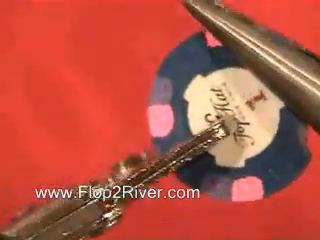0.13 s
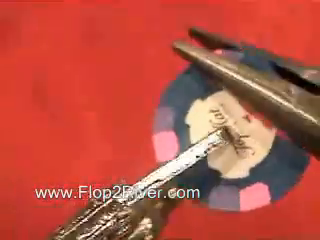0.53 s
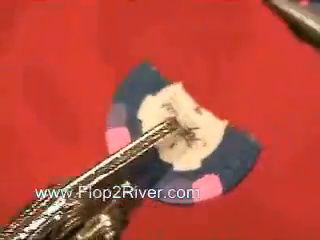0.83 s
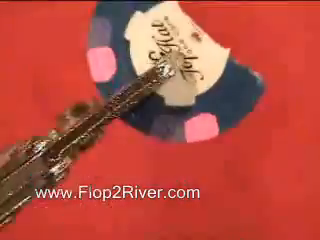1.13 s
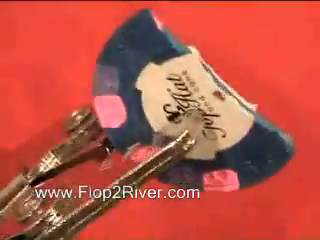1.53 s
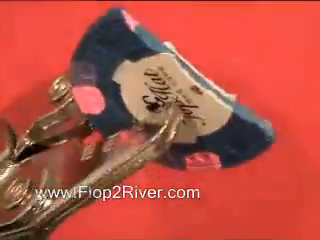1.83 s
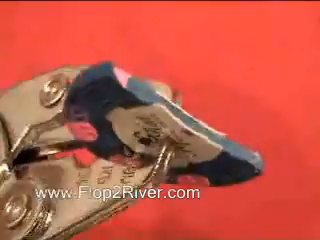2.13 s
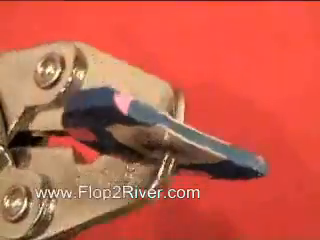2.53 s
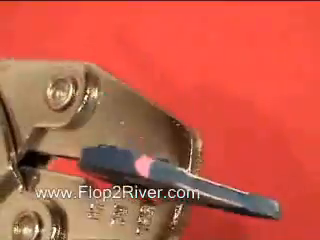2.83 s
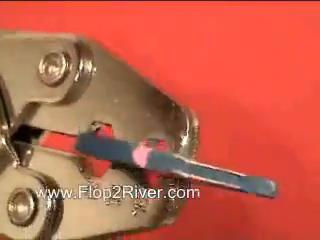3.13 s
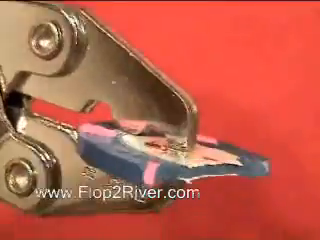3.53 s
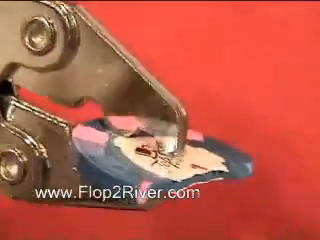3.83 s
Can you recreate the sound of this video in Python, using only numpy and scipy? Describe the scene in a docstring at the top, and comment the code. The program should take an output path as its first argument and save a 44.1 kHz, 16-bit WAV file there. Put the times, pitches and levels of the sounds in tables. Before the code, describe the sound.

A plastic disc snaps in pliers, close to the microphone in a small room. Faint creaking ticks start at about 0.35 s; near 0.48-0.51 s three bright, hard cracks come almost as one, with splintery crackle. A shard lands in soft, tiny knocks until about 0.63 s, with a short room tail. Low, dull ventilation noise and a thin motor whine run throughout, alone until the end around 4 s.

```python
"""Indoor ventilation noise, swelling at the room's low resonances, and a small motor's thin whine run throughout.
Close by, pliers bend a plastic disc: it creaks in tiny ticks, clicks ringing its modes over splinter crackle.
It breaks in three sharp cracks, and the shard lands on the table in soft band-limited knocks.
A smeared table echo and a decaying noise tail answer each of these close sounds."""
import sys
import numpy as np
from scipy import signal
from scipy.fft import rfft, irfft, next_fast_len
from scipy.io import wavfile

SR = 44100
rng = np.random.default_rng(int(sys.argv[2]) if len(sys.argv) > 2 else 0)


def dump(signal):
    """Clip the signal to [-1, 1] and save it as 16-bit WAV at the path in sys.argv[1]."""
    limited = np.clip(np.atleast_2d(signal).T, -1, 1)
    pcm = np.round(limited * 32767).astype(np.int16)
    wavfile.write(sys.argv[1], SR, pcm)


def invert_db(level):
    """Linear amplitude ratio for a level in decibels (20 dB per decade), elementwise."""
    return 10 ** (np.asarray(level, dtype=float) / 20)


N = 175518

# ventilation spectrum, relative: f/Hz, level/dB per Hz
AIR_SPECTRUM = [(13, -49.5), (22, -27), (40, -15.5), (55, -8.5), (85, -6), (130, -4.5), (230, -3),
                (320, -8), (600, -9.5), (1000, -14.5), (1500, -19), (2200, -21), (4000, -25.5),
                (6300, -31.5), (7300, -34), (8000, -47), (10000, -81)]
# room resonances colouring the air noise: f/Hz, width/Hz, lift/dB
ROOM_RESONANCES = [(60, 8, 3.5), (94.5, 23, 6), (112, 14, 5), (146, 11, 5), (180.5, 14.5, 6),
                   (203.8, 18.5, 8), (251, 26.6, 5.5), (295, 9.6, 3.5), (416, 120, 5), (1146, 99, 2.5)]
# left-right correlation of the air noise: f/Hz, correlation (ratio)
AIR_CORRELATION = [(60, 0.92), (160, 0.97), (430, 0.84), (1160, 0.54), (3110, 0.58), (8340, 0.33)]
# stereo balance of the air noise: f/Hz, left minus right level/dB
AIR_BALANCE = [(60, -4.5), (160, -6.0), (430, -6), (1160, -4), (3110, -2), (8340, 0.5)]
# motor whine before random spread and balance: f/Hz, rms level/dB
WHINE_LEVELS = [(1100, -76), (1580, -75.5), (1720, -66.5), (2050, -65.5), (2200, -67.5), (2400, -79.5),
                (2700, -69), (3100, -75), (3700, -74.5), (4500, -76.5), (5500, -88.5), (6500, -78.5),
                (7200, -90)]
# cracks running through the disc, dry: t/s, peak level/dB, pitch shift (ratio)
DISC_CRACKS = [(.3457, -30.5, 1.0), (0.348, -41.5, 0.76), (0.3635, -36, 1.0), (0.413, -31, 1.3),
               (0.4234, -33, .97), (.425, -39, 1.0), (.4329, -32, 1.1), (.4412, -33, 1.0),
               (0.448, -35, 1.0), (.455, -35, .96), (0.46, -41, 1.0), (0.4656, -41, 1.0),
               (0.475, -32, 0.52), (0.477, -36.5, 1.2), (0.482, -25, 1.2), (.4842, -3, 1.01),
               (0.4976, -1, .99), (0.5023, -16, 0.92), (0.5103, -4.5, 0.972), (0.5264, -19.5, 0.75)]
# disc modes at pitch ratio 1, before variation: f/Hz, width/Hz, level/dB
DISC_MODES = [(1200, 1400, -24.5), (2980, 256, -8), (4270, 300, -16), (4850, 270, -13), (6000, 600, -9),
              (6910, 450, -2), (7340, 600, -0.5), (8010, 350, -4.5)]
# splinter crackle while the plastic is strained, dry: t/s, rms level/dB
STRAIN_LEVELS = [(.34, -62), (.365, -59), (.395, -66), (.42, -53.5), (.481, -53), (.485, -27.5),
                 (.525, -33.5), (.54, -56), (.57, -60.5)]
# reverberation: f/Hz, t60/s
ROOM_DECAY = [(1000, 0.34), (3000, 0.33), (8000, 0.24)]
# the shard hits the table and bounces, dry: t/s, peak level/dB, f/Hz, width/Hz
SHARD_LANDINGS = [(.5192, -25, 2680, 1500), (0.5211, -18, 1810, 1300), (0.5316, -11, 2800, 4200),
                  (0.551, -32.5, 2310, 2500), (0.567, -27, 2000, 2500), (0.5734, -26, 3500, 4000),
                  (.6207, -33, 1820, 2490), (.6257, -28, 2400, 3000)]
# recorder's treble edge: f/Hz, level/dB
TREBLE_EDGE = [(7500, 0), (8000, -11), (8400, -34.5), (8900, -55)]

AIR_DB = -35  # rms of the left-right mean
SHAFT_HZ = 74.87
WHINE_LEAN_DB, NEAR_LEAN_DB = -8, 0.5  # left minus right
SPLINTERS_PER_S, SPLINTER_SPREAD_DB = 5000, 2
SPLINTER_BLUR = 2.2  # ratio, widens the disc modes
TABLE_ECHO_S, TABLE_ECHO_SPREAD_S, TABLE_ECHO_DB = 0.0019, 0.00065, -6
ROOM_DB, ROOM_SHARE = -9.5, 0.28  # tail gain; part of its power common to both sides
THUD_HZ, THUD_WIDTH_HZ, THUD_DB = 1246, 170, 1.5  # table-top ring, relative to the knock


def along(points, hz):
    """Interpolate (f/Hz, value) points on a log frequency axis."""
    f, value = np.transpose(points)
    return np.interp(np.log(hz + 1), np.log(f + 1), value)


def filtered(x, response):
    """Shape x by a complex response of frequency."""
    size = next_fast_len(x.shape[-1] + 8192)
    spectrum = rfft(x, size) * response(np.fft.rfftfreq(size, 1 / SR))
    return irfft(spectrum, size)[..., :x.shape[-1]]


def ring(peaks):
    """Causal response of (f/Hz, width/Hz, level/dB) resonances, summed with alternating sign."""
    def response(f):
        total = 0
        for k, (centre, width, db) in enumerate(peaks):
            mode = 1j * f * width / (centre * centre - f * f + 1j * f * width)
            total = total + (-1) ** k * invert_db(db) * mode
        return total
    return response


def add_click(track, s, db, response):
    """Ring a response with one impulse and lay it in the track at a set peak level."""
    impulse = np.zeros(1024)
    impulse[0] = 1
    blip = filtered(impulse, response)
    track[round(s * SR):][:len(blip)] += invert_db(db) * blip / np.abs(blip).max()


def ventilation():
    """Steady air noise lifted at the room's resonances, louder on the right in the bass."""
    def stereo_gain(f):
        lift = sum(db / (1 + (2 * (f - c) / w) ** 2) for c, w, db in ROOM_RESONANCES)
        angle = np.arccos(np.clip(along(AIR_CORRELATION, f), -1, 1)) / 2
        return invert_db(along(AIR_SPECTRUM, f) + lift) * np.array([np.cos(angle), np.sin(angle)])

    def balance(f):
        return invert_db(np.outer([0.5, -0.5], along(AIR_BALANCE, f)))

    # independent mid and side noises, mixed by angle, give the wanted correlation
    mid, side = filtered(rng.standard_normal((2, N)), stereo_gain)
    pair = filtered(np.array([mid + side, mid - side]), balance)
    return invert_db(AIR_DB) * pair / np.std(pair.mean(axis=0))


def motor():
    """Thin steady tones on odd multiples of the shaft rate, stronger on the right."""
    hz = SHAFT_HZ * np.arange(15, 97, 2)
    draw = rng.standard_normal((len(hz), 4))
    t = np.arange(N) / SR
    lean = [WHINE_LEAN_DB / 2, -WHINE_LEAN_DB / 2]
    # each tone strays by 1.7 dB per side
    db = along(WHINE_LEVELS, hz)[:, None] + 1.7 * draw[:, :2] + lean
    tones = np.sin(2 * np.pi * (np.outer(hz, t) + draw[:, 2:3]))
    return (np.sqrt(2) * invert_db(db)).T @ tones


def disc():
    """Each crack rings the disc with its own mix of modes; random splinters fill the gaps."""
    out = np.zeros(SR)
    mixes = rng.standard_normal((len(DISC_CRACKS), len(DISC_MODES)))
    for (s, db, ratio), mix in zip(DISC_CRACKS, mixes):
        # each mode strays by 2 dB from crack to crack
        modes = [(c * ratio, w, g + 2.0 * m) for (c, w, g), m in zip(DISC_MODES, mix)]
        add_click(out, s, db, ring(modes))

    chance, size, sign = rng.random((3, SR))
    sizes = invert_db(-SPLINTER_SPREAD_DB * np.log(size + 1e-3))  # a few splinters stand out
    ticks = (chance < SPLINTERS_PER_S / SR) * np.sign(sign - 0.5) * sizes
    s, level = np.transpose(STRAIN_LEVELS)
    strain = invert_db(np.interp(np.arange(SR) / SR, s, level, left=-120, right=-120))
    blurred = ring([(c, SPLINTER_BLUR * w, g) for c, w, g in DISC_MODES])
    return out + filtered(ticks * strain, blurred) / np.std(filtered(ticks, blurred))


def room(x):
    """A smeared echo off the table, then a tail dying by band, both partly shared by the two sides."""
    hz, t, bands = signal.stft(rng.standard_normal((3, SR // 2)), SR, nperseg=128)
    decay = invert_db(-60 * t / along(ROOM_DECAY, hz)[:, None])
    tails = signal.istft(bands * decay, SR, nperseg=128)[1]
    tail = np.sqrt(ROOM_SHARE) * tails[0] + np.sqrt(1 - ROOM_SHARE) * tails[1:]
    tail = tail / np.linalg.norm(tails[0])

    t = np.arange(tail.shape[1]) / SR
    grain = rng.standard_normal(len(t)) + 0.94 * rng.standard_normal((2, len(t)))
    echo = grain * np.exp(-((t - TABLE_ECHO_S) / TABLE_ECHO_SPREAD_S) ** 2)
    echo = invert_db(TABLE_ECHO_DB) * echo / np.linalg.norm(echo[0])
    answer = invert_db(ROOM_DB) * tail * (t > TABLE_ECHO_S) + echo
    return signal.fftconvolve(x[None], answer, axes=1)[:, :SR]


def shard():
    """Soft knocks: a twice-filtered resonance per impact plus a little table-top ring."""
    out = np.zeros(SR)
    thud = ring([(THUD_HZ, THUD_WIDTH_HZ, THUD_DB)])
    for s, db, hz, width in SHARD_LANDINGS:
        knock = ring([(hz, width, 0)])
        add_click(out, s, db, lambda f: knock(f) ** 2 + thud(f))
    return out


def scene():
    """Close dry sounds near the centre, their echoes, and the background."""
    near = disc() + shard()
    placed = near * invert_db([[NEAR_LEAN_DB / 2], [-NEAR_LEAN_DB / 2]])
    close = np.pad(placed + room(near), ((0, 0), (0, N - SR)))
    return close + ventilation() + motor()


def roll_off(x):
    """The treble ends steeply here."""
    return signal.sosfilt(signal.butter(12, 8940, fs=SR, output="sos"), x)


def record(dry):
    """The recorder's treble edge dulls the whole mix."""
    mix = filtered(dry, lambda f: invert_db(along(TREBLE_EDGE, f)))
    return roll_off(mix)


dry = scene()
out = record(dry)
dump(out)
```